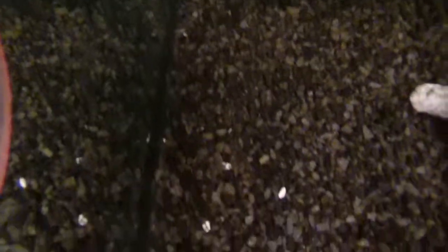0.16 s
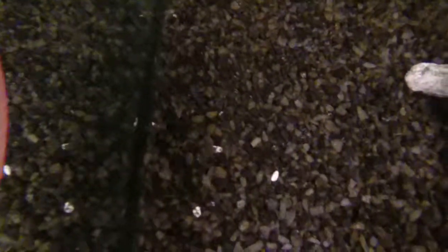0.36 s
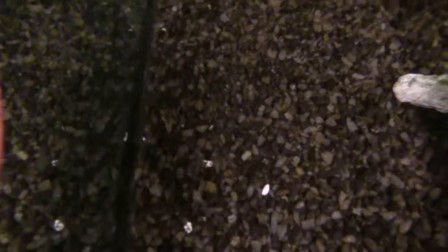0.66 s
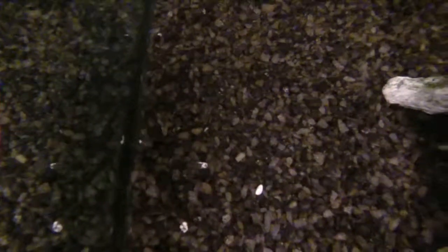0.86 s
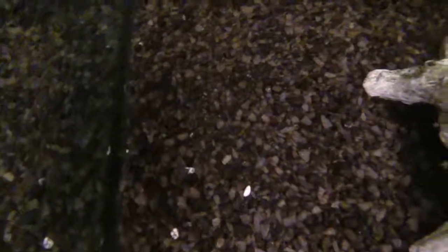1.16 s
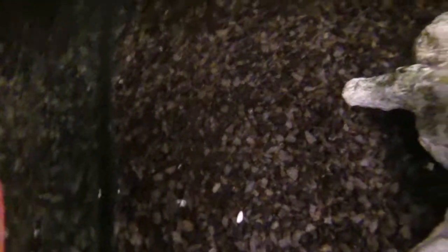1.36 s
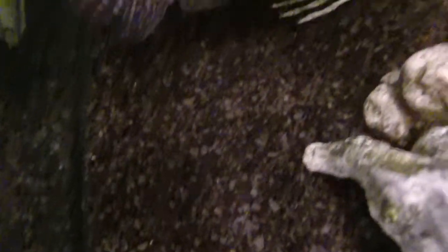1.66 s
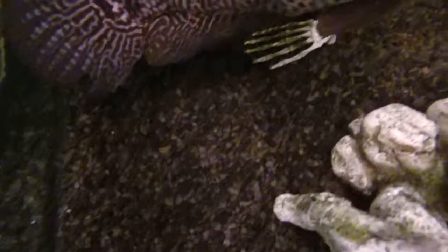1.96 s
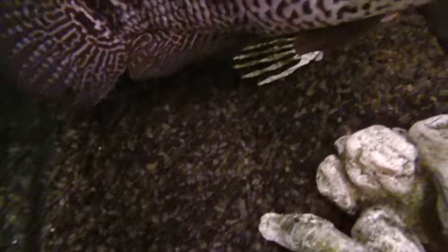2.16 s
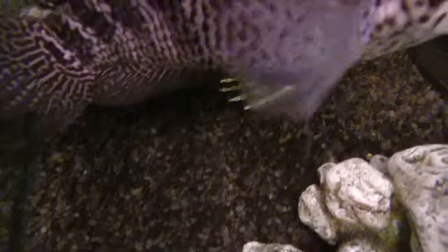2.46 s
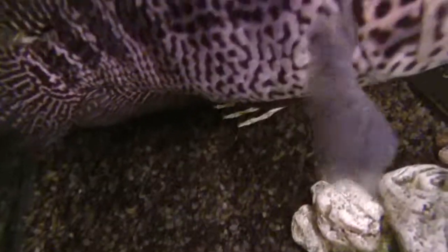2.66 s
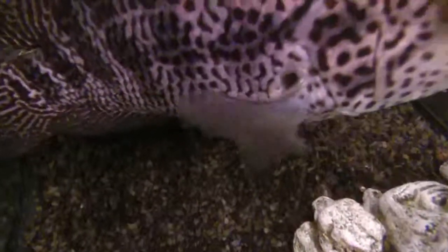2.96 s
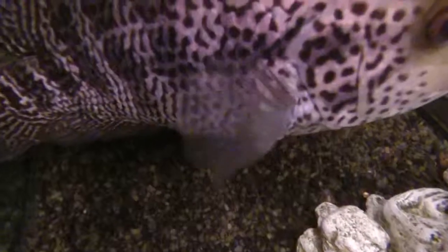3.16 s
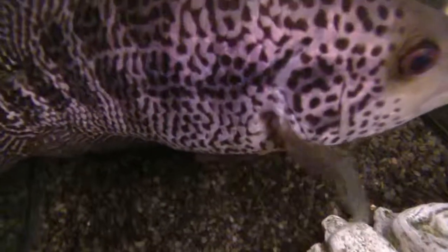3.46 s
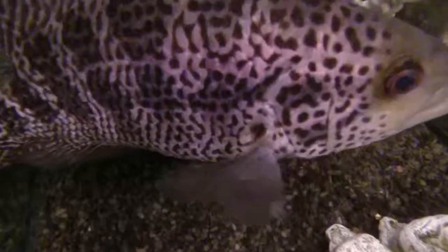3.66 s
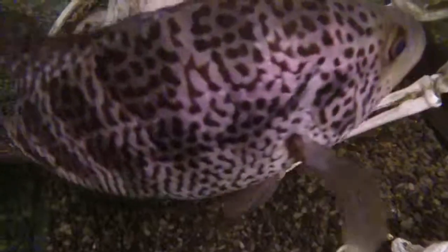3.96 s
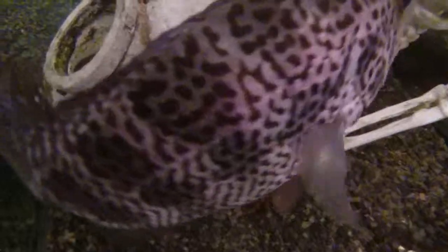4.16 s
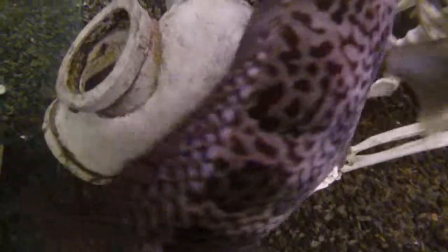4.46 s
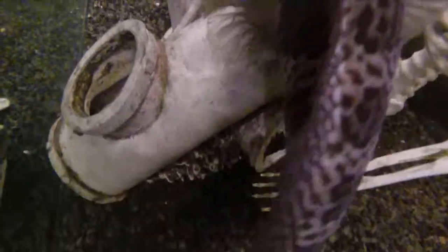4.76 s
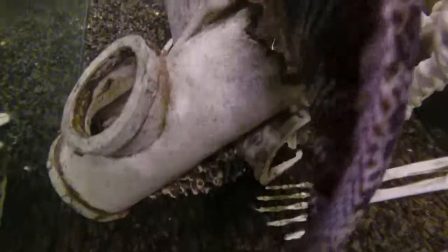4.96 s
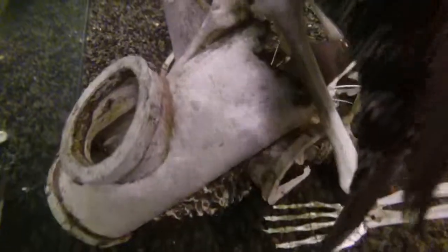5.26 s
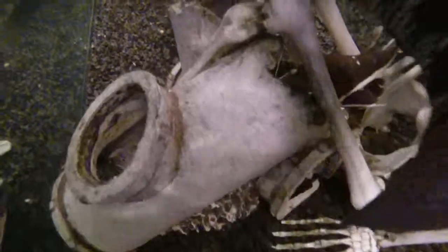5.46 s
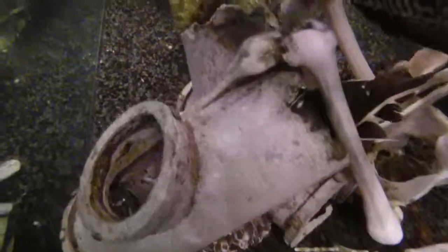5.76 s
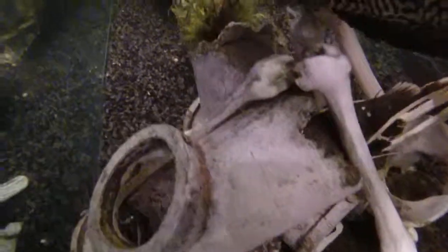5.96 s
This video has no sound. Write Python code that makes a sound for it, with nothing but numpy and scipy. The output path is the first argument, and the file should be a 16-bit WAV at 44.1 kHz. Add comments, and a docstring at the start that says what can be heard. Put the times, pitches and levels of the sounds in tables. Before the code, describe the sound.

Submerged mains hum and a rapid machine-like burble of air bubbles, sprinkled with glassy ticks, low handling rumble and two hollow thumps.

```python
"""A mains hum and a fast, even bubbling, under water in a fish tank: a camera housing drifts from a humming
filter motor towards an air outlet. Hum: sines on mains multiples plus narrow noise. Outlet: one string of
gliding sine bubbles repeated every 0.1 s, then loose bubbles. Tiny bubbles ping by striking the tank modes.
The moved housing rumbles and booms (resonant noise), rubs (grainy noise) and knocks (decaying modes)."""
import sys
import numpy as np
from scipy import signal
from scipy.io import wavfile
from scipy.ndimage import uniform_filter1d

SR = 44100
rng = np.random.default_rng(int(sys.argv[2]) if len(sys.argv) > 2 else 0)


def unload_wav(signal):
    """Save mono or channel-first audio to the path in sys.argv[1] as 16-bit WAV at rate SR, clipped to [-1, 1]."""
    wavfile.write(
        sys.argv[1],
        SR,
        np.round(np.clip(np.atleast_2d(signal).T, -1, 1) * 32767).astype(np.int16),
    )


N = 269892
T = np.arange(N) / SR
BAND_TOP_HZ = 15200
STRING_PERIOD_S, FIRST_STRING_S, STRINGS_END_S = .10008, .0012, 5.79  # period: six mains strokes

# camera path: [t/s, motor hum level/dB, air outlet level/dB, share of the open path to the outlet 0-1]
CAMERA_PATH = [(0, -32.5, -31, 0.35), (.75, -33, -36.5, 0.37), (1.25, -32, -34.5, 0.53),
               (1.6, -36, -39.5, 0.59), (2.2, -42.5, -35, 1), (2.8, -44.5, -31.5, 1), (3.3, -45.5, -30, 1),
               (3.8, -48, -27, 1), (4.3, -50.5, -27, 1), (4.8, -59, -27, 0.99), (5.3, -55.5, -26.5, 1),
               (6.12, -48, -23, 0.92)]
# one string: [delay/s, f at onset/Hz before detune, decay/s, shadowed-path level/dB, open-path level/dB],
# levels relative to the outlet
BUBBLE_STRING = [(-.0008, 553, .009, -24, 0), (-.0005, 570, .004, -2, -30), (.007, 525, .018, 0, -28),
                 (.009, 625, .014, -10, -30), (.014, 560, .007, -30, -15), (.026, 550, .006, -5, -16),
                 (.043, 570, .007, -10, -17), (.047, 890, .014, -22, -38), (.0525, 560, .004, -11, -7),
                 (.057, 600, .006, -20, -9), (.061, 570, .007, -7, -24), (.065, 720, .01, -20, -22),
                 (.076, 570, .008, -10, -17), (.085, 610, .007, -18, -15), (.093, 570, .005, -10, -15)]
# large bubbles out of step: [t/s, level/dB, f at onset/Hz, decay/s]
LOOSE_BUBBLES = [(5.796, -35.5, 540, 0.015), (5.847, -22.5, 507, 0.0024), (5.852, -28, 560, 0.0053),
                 (5.859, -39.5, 700, 0.011), (5.879, -42, 630, 0.023), (5.899, -21, 543, 0.0046),
                 (5.909, -34, 538, 0.02), (5.952, -25, 530, 0.0091), (5.955, -30, 718, .014),
                 (5.99, -27.5, 526, 0.0076), (6.04, -35, 530, 0.013), (6.079, -26.5, 543, 0.0027),
                 (6.088, -23.5, 540, 0.0083)]


def outlet():
    """Air outlet: the same string of bubbles repeats; weak bubbles vary more than strong ones."""
    out = np.zeros(N)
    _, level_db, open_path = curves(CAMERA_PATH)
    for start_s in np.arange(FIRST_STRING_S, STRINGS_END_S, STRING_PERIOD_S):
        share = np.clip(open_path[round(start_s * SR)], 0, 1)
        chances = rng.standard_normal((len(BUBBLE_STRING), 3))
        for (delay_s, hz, decay_s, shadowed_db, open_db), chance in zip(BUBBLE_STRING, chances):
            size = (1 - share) * gain_of(shadowed_db) + share * gain_of(open_db)
            scatter_db = 2.6 - 2.2 * min(size, 1) ** .5
            jitter_s = .00015 * scatter_db * chance[1]
            detune = 1 + .008 * scatter_db * chance[2]
            if start_s + delay_s < STRINGS_END_S:
                sound = size * gain_of(scatter_db * chance[0]) * bubble(hz * detune, decay_s)
                add(out, start_s + delay_s + jitter_s, sound)
    out *= gain_of(level_db)
    for start_s, db, hz, decay_s in LOOSE_BUBBLES:
        add(out, start_s, gain_of(db) * bubble(hz, decay_s))
    return out


def bubble(hz, decay_s, rise_s=0.0016, push_db=-12):
    """A bubble pinches off with a low push, rings with rising pitch and is damped by the next surge of air."""
    glide = 0.0093  # pitch rises by 2 * glide per decay time
    t = np.arange(round(4 * decay_s * SR)) / SR
    rise = 1 - np.exp(-t / rise_s)
    envelope = rise * (np.exp(-(t / decay_s) ** 2.03) + 0.22 * np.exp(-t / decay_s))
    ring = envelope * np.sin(2 * np.pi * hz * (t + glide * t ** 2 / decay_s))
    push = gain_of(push_db) * np.sin(2 * np.pi * 320 * t) * rise * np.exp(-(t / 0.0072) ** 2)
    return -ring - push


MAINS_HZ, WHINE_END_S, WHINE_FADE_S = 59.95, 2.95, .2
# hum: [multiple of mains, filter motor level/dB re path hum level, air pump level/dB]
HUM = [(1, -15, -71), (2, 0, -55.5), (3, -17.5, -76.5), (4, -34.5, -59.5), (5, -36, -65.5),
       (6, -15.5, -75.5), (7, -38.5, -69.5), (8, -32, -65), (11, -36.5, -87)]
# rattle that fades with the motor: (f/Hz, width/Hz, level/dB re path hum level)
CASING_RATTLE = (186, 19, -22.5)
# faint high whistle that stops: (f/Hz, width/Hz, level/dB before its fade)
HIGH_WHINE = (12250, 260, -92)
# steady tone: (f/Hz, level/dB)
STEADY_DRONE = (189.9, -59.5)


def pumps():
    """Mains hum of the filter motor follows the camera path; the buzz of the air pump stays."""
    motor_gain = gain_of(curves(CAMERA_PATH)[0])
    out = motor_gain * whistle(*CASING_RATTLE)
    out += whistle(*HIGH_WHINE) * np.clip((WHINE_END_S - T) / WHINE_FADE_S, 0, 1)
    for multiple, motor_db, pump_db in HUM:
        out += (motor_gain * gain_of(motor_db) + gain_of(pump_db)) * tone(multiple * MAINS_HZ)
    drone_hz, drone_db = STEADY_DRONE
    return out + gain_of(drone_db) * tone(drone_hz)


def tone(hz):
    """Sine of power 1 with a chance phase."""
    return np.sqrt(2) * np.sin(2 * np.pi * (hz * T + rng.random()))


def whistle(hz, width_hz, db):
    """Noise through a narrow resonance, twice."""
    once = resonate(rng.standard_normal(N), hz, width_hz)
    return gain_of(db) * evened(resonate(once, hz, width_hz))


DENSE_HZ, DENSE_STEP_HZ = 5280, 150.  # modes crowd together above this
EDGE_DB = -30  # share of a low ping that stirs the first crowded modes
FAR_DB, FAR_COUNT = -63, 20
LEAD_S, LEAD_DB, LEAD_CHANCE = .011, -56, .3  # faint ping just ahead of a string
# water modes between glass walls: [f/Hz, level/dB before chance spread, t60/s]
TANK_MODES = [(1226, 6.5, 0.14), (1648, 8, 0.038), (2002, -5, 0.039), (2204, -7, 0.073), (2528, 0.5, 0.061),
              (2840, 2, 0.04), (2975, -3.5, 0.036), (3267, -3, 0.038), (3405, -1, 0.063), (3700, -1, 0.064),
              (4150, 6.5, 0.018), (4360, 4, 0.053), (4800, 5, 0.035), (5500, -7, 0.026)]
# tiny bubbles; a ping with both a low and a bright treble part takes two rows:
# [t/s, level/dB, centre f/Hz, bandwidth/octaves]
TINY_BUBBLES = [(0.02, -44.5, 2200, 0.33), (0.13, -48.5, 2500, 0.34), (.2226, -38, 3890, .27),
                (.3977, -49.5, 4620, .6), (.413, -51, 2830, .2), (.527, -55, 2540, .2),
                (0.588, -43.5, 2880, .32), (.818, -36.5, 2660, 0.28), (0.891, -43.5, 5730, 0.33),
                (.89, -51, 3640, 0.45), (.987, -43, 3660, .21), (1.1143, -50, 2820, .31),
                (1.3028, -58, 10200, .2), (1.393, -42, 2420, .41), (1.4236, -29, 2870, 0.3),
                (1.5244, -49.5, 2350, .26), (1.6187, -51, 2520, .29), (1.6947, -54, 10400, 0.32),
                (1.804, -56.5, 8500, .2), (1.9034, -56.5, 8300, .2), (1.9154, -45.5, 2040, .28),
                (1.9315, -43.5, 3540, 0.13), (1.9907, -46.5, 2450, 0.5), (2.0898, -46.5, 6600, 0.27),
                (2.0898, -50, 3560, .3), (2.1202, -41, 6560, 0.27), (2.1194, -43.5, 3550, .63),
                (2.2215, -32, 3650, 0.49), (2.274, -43, 3370, 0.23), (2.791, -47.5, 3320, .2),
                (2.89, -51.5, 3580, 0.17), (2.929, -34.5, 3510, 0.49), (2.9288, -46, 6000, .4),
                (2.9761, -50, 2980, .26), (3.0278, -45.5, 2040, 0.35), (3.1907, -54, 2440, .26),
                (3.2912, -45, 3590, .3), (3.3764, -39.5, 3180, .17), (3.5154, -48, 2080, .31),
                (3.6228, -42, 2300, 0.34), (3.789, -40.5, 3000, 0.24), (3.8104, -59, 10000, 0.42),
                (3.8912, -55, 11200, 0.71), (4.09, -37.5, 3050, 0.19), (4.112, -53.5, 10000, 1),
                (4.1904, -36.5, 2560, 0.41), (4.19, -48, 9200, 0.97), (4.217, -43.5, 7740, 0.32),
                (4.219, -50, 2450, 0.62), (4.4913, -53, 2440, .26), (4.5895, -53, 2400, .3),
                (4.6908, -51.5, 3530, 0.47), (5.0898, -51, 1880, 0.84), (5.393, -51.5, 2180, .29),
                (5.4912, -46, 1920, 0.22), (5.5952, -43.5, 3840, 1), (5.5952, -55, 5800, .3),
                (5.6222, -37, 2970, .26), (5.793, -50.5, 2980, .24), (5.882, -44, 2020, 0.16),
                (5.927, -35.5, 2084, 0.19), (5.928, -48, 1250, .1), (5.9464, -42, 3090, .19),
                (5.9464, -52, 13000, 0.9), (5.971, -37, 3060, 0.19), (6.0487, -50, 11050, 0.83)]


def pings():
    """Each tiny bubble strikes the tank modes near its own pitch, or a patch of the crowded ones."""
    out = np.zeros(N)
    grid_hz = np.arange(DENSE_HZ, BAND_TOP_HZ, DENSE_STEP_HZ)
    crowded_hz = grid_hz + 60 * rng.standard_normal(len(grid_hz))
    crowded = np.c_[crowded_hz, 0 * grid_hz, .04 + 0 * grid_hz]  # 0 dB, t60 0.04 s
    all_modes = list(TANK_MODES) + list(crowded)
    for when, pitch in rng.random((FAR_COUNT, 2)):  # far bubbles at chance moments
        far = strike(all_modes, 2300 * 5 ** pitch, .1, rise_s=.001, spill=0)
        add(out, when * N / SR, gain_of(FAR_DB) * far)
    starts = np.arange(FIRST_STRING_S + STRING_PERIOD_S, STRINGS_END_S, STRING_PERIOD_S)
    for start_s, (luck, pitch) in zip(starts, rng.random((len(starts), 2))):
        if luck < LEAD_CHANCE:
            lead = strike(TANK_MODES, 2000 * 1.8 ** pitch, .26, rise_s=.0004, spill=0)
            add(out, start_s - LEAD_S, gain_of(LEAD_DB) * lead)
    for start_s, db, hz, octaves in TINY_BUBBLES:
        if hz > DENSE_HZ:
            ping = strike(crowded, hz, octaves, rise_s=0.00037, spill=0.014)
        else:
            edge = strike(crowded, DENSE_HZ, octaves, rise_s=0.0005, spill=0.055)
            ping = strike(TANK_MODES, hz, octaves, rise_s=0.00053, spill=0.021) + gain_of(EDGE_DB) * edge
        add(out, start_s, gain_of(db) * ping)
    return out


def strike(modes, hz, octaves, rise_s, spill):
    """Rings the modes near hz, the closest most, each with chance strength and phase; weights have unit norm."""
    t = np.arange(4000) / SR
    mode_hz, mode_db, t60_s = np.transpose(modes)[:, :, None]
    spread, phase = rng.standard_normal((len(modes), 2)).T[:, :, None]
    apart = np.log2(mode_hz / hz)  # octaves
    broad = .5 * np.exp(-.5 * (apart / max(octaves, .05)) ** 2)
    sharp = 1.5 * np.exp(-.5 * (apart / .04) ** 2)
    weight = (broad + sharp + spill) * gain_of(mode_db + 2 * spread)
    ring = weight * gain_of(-60 * t / t60_s) * np.sin(2 * np.pi * mode_hz * t + 2 * phase)
    return ring.sum(0) * (1 - np.exp(-t / rise_s)) / np.sqrt(np.sum(weight ** 2))


def housing():
    """Camera housing: grip and water flow shake it, fingers rub it, and it is knocked twice."""
    return shaking() + rubbing() + knocks()


def shaking():
    """Low rumble and the boom of the flexing case: noise through stacked resonances."""
    rumble_gain, boom_gain = grip()
    shake, flex, creak = rng.standard_normal((3, N))
    rumble = evened(resonate(resonate(shake, 48, 28), 67.5, 49.5))
    boom = evened(resonate(resonate(resonate(flex, 131.7, 63), 117.3, 54), 120, 81))
    second_mode = evened(resonate(resonate(creak, 355, 90), 367, 120))
    return rumble_gain * rumble + boom_gain * (boom + gain_of(-16.0) * second_mode)


JOLT_RISE_S, JOLT_T60_S = 0.017, 0.2
CALM_BOOM_DB, LUMP_DB, LUMP_S = -9.5, 2, 0.045  # boom re rumble; lump depth and smoothing
# steady shaking between jolts: [t/s, rumble level/dB before lumps]
STEADY_SHAKE = [(0, -48), (.8, -51.5), (1.1, -40), (2.3, -45.5), (3.4, -49.5), (4.7, -50.5), (5.4, -43),
                (6.12, -39.5)]
# jolts of the hand: [t/s, hold/s, rumble level/dB, case boom level/dB]
HAND_JOLTS = [(0.85, 0.037, -34.5, -42), (1.156, 0.16, -35, -40.5), (1.3, 0.13, -33, -37),
              (1.556, 0.098, -28, -40.5), (1.79, 0.084, -37, -60), (1.901, .06, -30, -36),
              (2.023, 0.045, -26.5, -41.5), (2.245, 0.014, -38.5, -43.5), (2.46, 0.067, -40, -67),
              (3.577, 0.08, -34.5, -45), (4.485, 0.021, -42, -50), (4.845, 0.11, -32, -34.5),
              (4.966, .13, -31, -34), (5.183, 0.045, -34.5, -46), (5.4, 0.18, -51, -49)]


def grip():
    """Gains of rumble and boom: lumpy steady shaking, and jolts that rise, hold and die away."""
    size = round(LUMP_S * SR)
    lumps = evened(uniform_filter1d(uniform_filter1d(rng.standard_normal(N), size), size))
    calm = gain_of(curves(STEADY_SHAKE)[0] + LUMP_DB * lumps)
    power = np.array([calm, calm * gain_of(CALM_BOOM_DB)]) ** 2
    for start_s, hold_s, rumble_db, boom_db in HAND_JOLTS:
        rise = np.clip((T - start_s) / JOLT_RISE_S, 0, 1)
        fall_db = -60 * np.maximum(T - start_s - JOLT_RISE_S - hold_s, 0) / JOLT_T60_S
        power += (gain_of([[rumble_db], [boom_db]]) * rise * gain_of(fall_db)) ** 2
    return np.sqrt(power)


# rub spectrum: [f/Hz, relative level/dB per Hz]
RUB_SPECTRUM = [(700, -33), (1000, -5), (1300, 2.5), (1700, 0), (2000, -6), (2600, -7)]
# scrapes: [t/s, length/s, level/dB]
RUB_SCRAPES = [(1.222, .12, -63), (1.36, 0.076, -61.5), (1.9, 0.24, -70), (2.453, 0.066, -60.5),
               (4.883, 0.24, -63), (5.006, 0.13, -64), (5.482, 0.043, -58), (5.858, 0.14, -58.5)]


def rubbing():
    """Fingers on the housing: coloured noise made grainy by stick and slip, gated by pressure."""
    rub, pressure = coloured(RUB_SPECTRUM, patchy_db=1.0), np.zeros(N)
    for start_s, length_s, db in RUB_SCRAPES:
        add(pressure, start_s, gain_of(db) * signal.windows.tukey(round(length_s * SR), .6))
    grain_db = 3.5 * evened(uniform_filter1d(rng.standard_normal(N), size=200))
    return pressure * evened(gain_of(grain_db) * rub)


THUMP_LAG_S = .004
# knocks: [t/s, shell ring level/dB, thump level/dB]
CASE_KNOCKS = [(3.587, -28.5, -16), (4.878, -24, -12.5)]
# low modes of the whole case: [f/Hz, level/dB re thump, t60/s]
THUMP_MODES = [(81, 0.5, 0.11), (124.4, -14.5, 0.16), (59.2, -10.5, 0.38)]
# shell modes: [f/Hz, level/dB re shell ring, t60/s]
SHELL_MODES = [(708, 2, 0.034), (340, -6, 0.051), (1190, -22, 0.045), (1820, -2.5, 0.011),
               (2600, -19, 0.018), (3500, -23, 0.014)]


def knocks():
    """A knock rings the shell, then the whole case a little later and with a slower rise."""
    out, n = np.zeros(N), np.arange(15000)
    thump = -ring_of(THUMP_MODES) * (1 - np.exp(-n / 130))  # rises in samples
    shell = ring_of(SHELL_MODES) * (1 - np.exp(-n / 30))
    for start_s, shell_db, thump_db in CASE_KNOCKS:
        add(out, start_s + THUMP_LAG_S, gain_of(thump_db) * thump)
        add(out, start_s, gain_of(shell_db) * shell)
    return out


def ring_of(modes):
    """Sum of exponentially decaying sines."""
    t = np.arange(15000) / SR
    return sum(gain_of(db - 60 * t / t60_s) * np.sin(2 * np.pi * hz * t) for hz, db, t60_s in modes)


# water flow and microphone hiss: [f/Hz, relative level/dB per Hz]
FLOOR_SPECTRUM = [(18, 0), (40, 8), (90, -3.5), (200, -18.5), (280, -11), (490, -9), (600, -15), (750, -13),
                  (850, -21.5), (1340, -22), (3420, -28), (7000, -36.5), (12200, -44), (15100, -50.5)]


def background():
    """Water flow and microphone hiss as one coloured noise."""
    return gain_of(-49) * coloured(FLOOR_SPECTRUM, patchy_db=1.2)


def coloured(points, patchy_db):
    """Noise of a given spectrum with patches that drift over time and frequency."""
    bin_hz = np.fft.rfftfreq(1024, 1 / SR)
    point_hz, point_db = np.transpose(points)
    real, imag, patches = rng.standard_normal((N // 256 + 5, 513, 3)).T
    patches = evened(uniform_filter1d(uniform_filter1d(patches, size=12, axis=0), size=8, axis=1))
    shape_db = np.interp(np.log(bin_hz + 1), np.log(point_hz + 1), point_db, left=-90, right=-90)[:, None]
    spectrum = (real + 1j * imag) * gain_of(shape_db + patchy_db * patches)
    return evened(signal.istft(spectrum, nperseg=1024, noverlap=768)[1][:N])


def resonate(x, hz, width_hz):
    """Resonance: shifts hz down to zero, smooths with one pole, and shifts back."""
    turn = np.exp(2j * np.pi * np.cumsum(hz * np.ones(len(x))) / SR)
    pole = np.exp(-np.pi * width_hz / SR)
    return 2 * (turn * signal.lfilter([1 - pole], [1, -pole], x / turn)).real


def gain_of(db):
    """Amplitude factor from dB."""
    return 10 ** (np.asarray(db) / 20)


def evened(x):
    """Scales to RMS 1."""
    return x / np.sqrt(np.mean(x ** 2) + 1e-20)


def curves(rows):
    """Interpolates each column over time, first column t/s."""
    s, *columns = np.transpose(rows)
    return [np.interp(T, s, c) for c in columns]


def add(mix, start_s, sound):
    """Adds a sound in place, cut at the end of the mix."""
    part = mix[max(round(start_s * SR), 0):][:len(sound)]
    part += sound[:len(part)]


def scene():
    """Sum of all sources, one channel."""
    return (outlet() + pumps() + pings() + housing() + background())[None]


def record(dry):
    """Band limit of the camera: linear-phase low-pass."""
    lowpass = signal.firwin(511, BAND_TOP_HZ, window=("kaiser", 9), fs=SR)
    return signal.oaconvolve(dry, lowpass[None], "same")


dry = scene()
out = record(dry)
unload_wav(out)
```